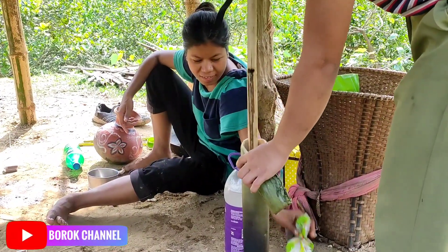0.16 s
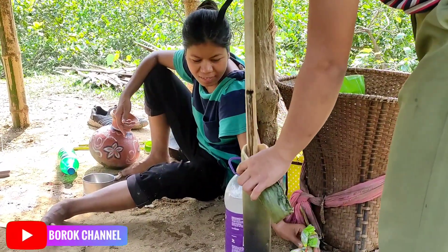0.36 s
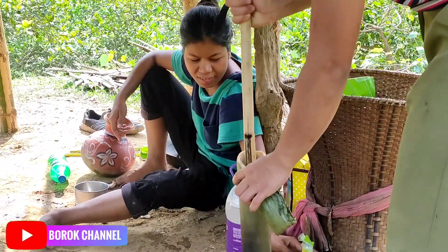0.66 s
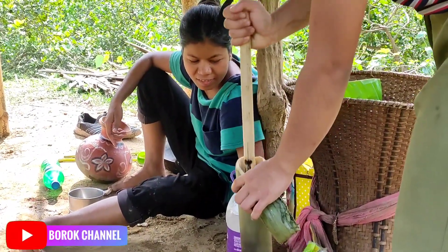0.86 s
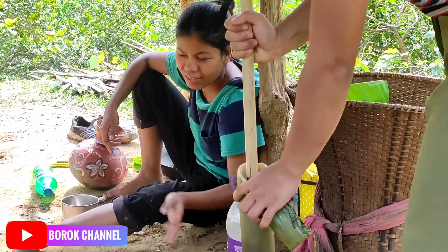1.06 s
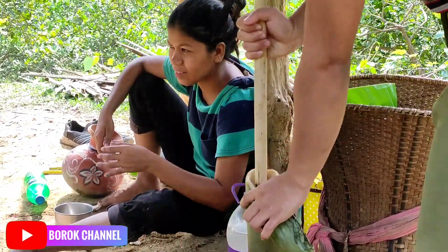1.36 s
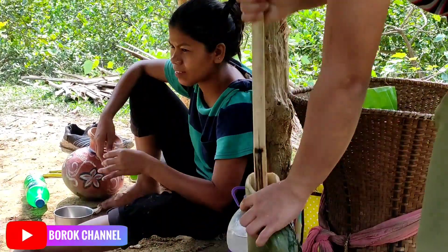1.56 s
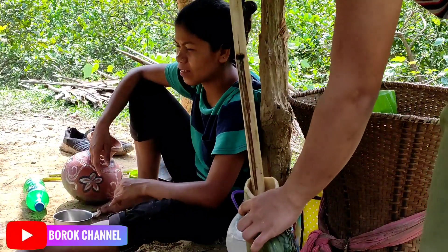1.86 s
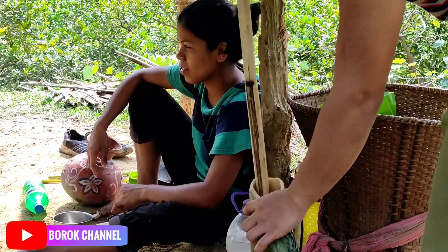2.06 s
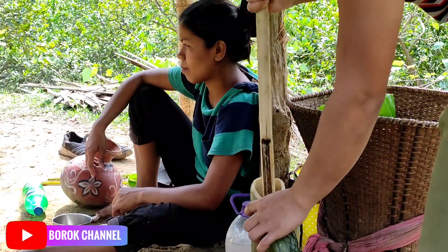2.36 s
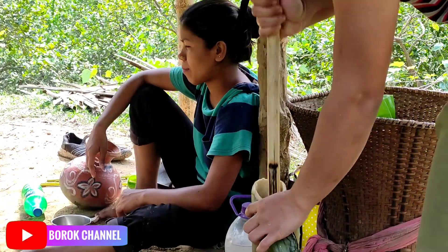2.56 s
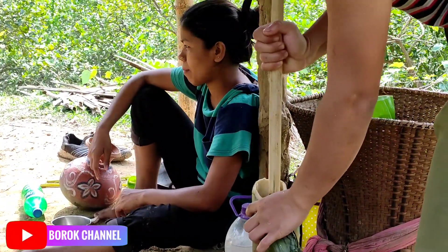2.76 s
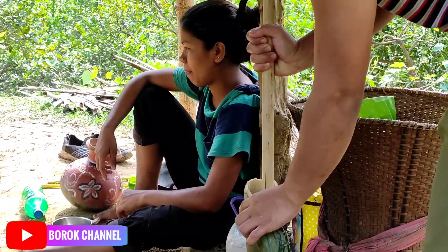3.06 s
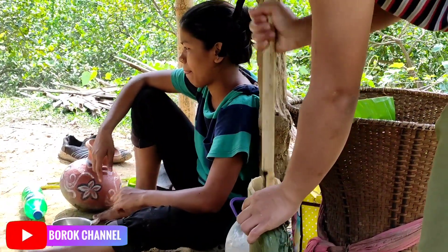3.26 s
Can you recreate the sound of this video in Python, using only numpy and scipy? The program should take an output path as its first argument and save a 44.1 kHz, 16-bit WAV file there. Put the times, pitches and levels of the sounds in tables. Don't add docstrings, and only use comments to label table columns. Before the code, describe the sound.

A bamboo stick scrapes inside a bamboo tube close by: a sharp hollow knock and bright rasp at 0.3 s, fading by 0.5, softer dull rubbing from 1.7 to 2.5, and a firmer stroke at 3.05 trailing off. Low wind puffs thump the left microphone throughout. Leaves hiss, insects buzz, a near bird trills repeatedly, a cricket chirps, faint whistles pass, and tiny grit ticks crackle, mostly before 1.7.

```python
import sys
import numpy as np
from scipy import signal
from scipy.fft import rfft, irfft, next_fast_len
from scipy.io import wavfile
from scipy.ndimage import uniform_filter1d, map_coordinates

SR = 44100
rng = np.random.default_rng(int(sys.argv[2]) if len(sys.argv) > 2 else 0)


def digitize_waveform(pressure):
    field = np.atleast_2d(pressure).T
    bounded = np.clip(field, -1, 1)
    quanta = np.round(bounded * 32767).astype(np.int16)
    wavfile.write(sys.argv[1], SR, quanta)


def attenuation_scalar(level_db):
    decades = np.asarray(level_db, float) / 20
    return 10 ** decades


N = 149940


def unit(x):
    return x / np.sqrt(np.mean(x ** 2) + 1e-20)


def along(points, hz):
    f, v = np.transpose(points)
    return np.interp(np.log(hz + 1), np.log(f + 1), v)


def shaped(points):
    return lambda hz: attenuation_scalar(along(points, hz)) * (hz > .8 * points[0][0])


def curve(rows):
    return np.interp(np.arange(N) / SR, *np.transpose(rows))


def wobble(rate):
    knots = rng.standard_normal(int(N * rate / SR) + 4)
    return map_coordinates(knots, [np.arange(N) * rate / SR])


def filtered(x, response):
    m = next_fast_len(N + SR // 2)
    return irfft(rfft(x, m) * response(np.fft.rfftfreq(m, 1 / SR)), m)[..., :N]


def peak(f, hz, wide):
    return 1j * f * wide / (hz * hz - f * f + 1j * f * wide)


def patchy(patchy_db):
    z = signal.stft(rng.standard_normal((2, N)), nperseg=512)[2]
    field = uniform_filter1d(rng.standard_normal(z.shape[1:]), size=6, axis=0)
    field = uniform_filter1d(field, size=8, axis=1)
    return signal.istft(z * attenuation_scalar(patchy_db * unit(field)), nperseg=512)[1][:, :N]


def panned(x, db):
    return x * attenuation_scalar(np.array([[db / 2], [-db / 2]]))


# start in seconds, length in seconds, level in dB.
GUSTS = [(-.03, 0.079, -37.5), (0.069, 0.15, -34.5), (0.31, 0.1, -35), (0.471, 0.11, -39),
         (0.552, 0.12, -42), (0.768, 0.043, -39), (0.84, 0.16, -47), (1.149, 0.087, -45),
         (1.264, 0.067, -48.5), (1.555, 0.14, -53), (1.68, 0.2, -48), (1.94, 0.21, -39), (2.224, 0.22, -46),
         (2.44, 0.17, -43), (2.64, 0.25, -40), (2.84, .32, -48), (3.095, 0.12, -45), (3.26, 0.085, -39.5)]
# time in seconds, peak in dB, width in ms.
PUFFS = [(0.105, -28.5, 10), (0.13, -30.0, 4.2), (0.162, -24.5, 3.8), (0.18, -31, 4.9), (0.356, -34.5, 4.9),
         (0.42, -26.5, 6.9), (0.455, -31.5, 4.7), (0.501, -31.5, 3.2), (0.513, -32, 4.2),
         (0.784, -30.5, 6.7), (0.945, -32.5, 8.5), (1.196, -34.0, 9.2), (1.329, -34.5, 6.1),
         (1.76, -33, 5.4), (1.998, -26, 5.7), (2.094, -27.5, 7.4), (2.245, -30.5, 8), (2.476, -27, 3.9),
         (2.502, -26, 6.5), (2.545, -32, 5.1), (2.696, -25.5, 4.9), (2.721, -29.5, 3.8),
         (2.754, -26.0, 3.6), (2.791, -26.5, 5.1), (2.804, -32.0, 7.4), (2.827, -30.5, 3.9),
         (3.164, -23.5, 6.3), (3.18, -27.5, 6.5), (.369, -36, 5), (.482, -37, 14), (.554, -37, 11),
         (.574, -37, 7), (.616, -36, 8), (.914, -36, 8), (2.026, -37, 12), (2.567, -35, 8), (2.618, -36, 7),
         (2.656, -37, 6), (2.771, -33, 6), (3.305, -38, 5)]
# time in seconds, depth in dB, width in ms.
DIPS = [(.337, -33, 4), (.345, -33, 6), (.442, -33, 10), (.496, -32, 4), (.521, -30, 5), (.543, -33, 8),
        (.604, -36, 6), (.625, -37, 5), (.872, -34, 5), (.922, -37, 7), (2.003, -30, 6), (2.036, -34, 6),
        (2.088, -31, 7), (2.833, -32, 4), (3.15, -34, 20)]
# frequency in Hz, level in dB per Hz.
RUMBLE = [(7.1, -24), (12, 0.5), (45, 0), (73, -6.5), (135, -20.5), (349, -32.5), (500, -37), (650, -60),
          (1100, -120)]
# frequency in Hz, level in dB per Hz.
LEE = [(10, -6), (30, -2.5), (100, -31), (300, -43), (600, -43.5)]
CALM_DB, LEE_DB = -51.5, -56
EDDY_DB = 2
GUST_HZ, GUST_WIDE_HZ = 89.5, 140
UNDERSHOOT, UNDERSHOOT_WIDER, UNDERSHOOT_LAG = .8, 1.9, .6
FWHM_MS = 1665


def wind():
    t = np.arange(N) / SR
    gusts = np.zeros(N)
    for s, length, db in GUSTS:
        gusts += attenuation_scalar(db) * np.sin(np.pi * np.clip((t - s) / length, 0, 1)) ** 2
    calm = unit(filtered(rng.standard_normal(N), shaped(RUMBLE)))
    brisk = unit(filtered(calm, lambda f: peak(f, GUST_HZ, GUST_WIDE_HZ)))
    left = attenuation_scalar(EDDY_DB * wobble(22)) * (attenuation_scalar(CALM_DB) * calm + gusts * brisk)
    for s, db, ms in PUFFS:
        near = slice(max(round((s - .06) * SR), 0), round((s + .06) * SR))
        u = (t[near] - s) / (ms / FWHM_MS)
        push = (1 + UNDERSHOOT) / np.cosh(1.436 * u) ** 1.17
        trough = UNDERSHOOT * np.exp(-((u - UNDERSHOOT_LAG) / UNDERSHOOT_WIDER) ** 2)
        left[near] += attenuation_scalar(db) * (push - trough)
    for s, db, ms in DIPS:
        near = slice(round((s - .06) * SR), round((s + .06) * SR))
        left[near] -= attenuation_scalar(db) * np.exp(-((t[near] - s) / (ms / FWHM_MS)) ** 2)
    sheltered = unit(filtered(rng.standard_normal(N), shaped(LEE)))
    return np.array([left, attenuation_scalar(LEE_DB + EDDY_DB * wobble(5.83)) * sheltered])


# frequency in Hz, level in dB per Hz.
LEAVES = [(88, 0.5), (150, -6.5), (577, -19.5), (1330, -18.5), (2400, -14), (4400, -18.5), (7200, -16),
          (8550, -21), (14000, -21.5)]
# centre in Hz, width in Hz, level in dB.
CHORUS = [
    (900, 295, -76),
    (2340, 840, -74),
    (6920, 730, -76.5),
]
# frequency in Hz, left-right balance in dB.
LEAN = [(60, 30), (180, -17), (540, 2), (1610, -2), (4830, -8.5), (14500, 1.5)]
# frequency in Hz, left-right likeness from 0 to 1.
ALIKE = [(150, 0.034), (350, 1), (700, 0.48), (1300, 0.052)]
LEAVES_DB, CHORUS_SWELL_DB = -60, .8


def forest():
    leaves = unit(filtered(patchy(patchy_db=2.6), shaped(LEAVES)))
    hiss = attenuation_scalar(LEAVES_DB + 0.4 * wobble(2.48)) * leaves
    for hz, wide, db in CHORUS:
        band = unit(filtered(patchy(patchy_db=2), lambda f: peak(f, hz, wide) ** 2))
        hiss = hiss + attenuation_scalar(db + CHORUS_SWELL_DB * wobble(14)) * band
    turn = lambda hz: np.arccos(np.clip(along(ALIKE, hz), -1, 1)) / 2
    mid, side = filtered(hiss, lambda hz: [np.cos(turn(hz)), np.sin(turn(hz))])
    ports = np.array([mid + side, mid - side])
    return filtered(ports, lambda hz: attenuation_scalar(np.outer([.5, -.5], along(LEAN, hz))))


# time in seconds, level in dB.
KATYDID = [
    (0, -78),
    (.5, -76.5),
    (1.2, -74),
    (2.0, -71.5),
    (2.5, -75),
    (3.4, -78),
]
KATYDID_HZ, KATYDID_WIDE_HZ, KATYDID_PAN_DB = 11200, 1100, -11
BURSTS_PER_S, BURST_PEAK, BURST_SHARP = 39.64, .0072, 0.45


def katydid():
    phase = np.pi * BURSTS_PER_S * (np.arange(N) / SR - BURST_PEAK)
    gate = np.abs(np.cos(phase)) ** (2 * BURST_SHARP)
    rasp = filtered(rng.standard_normal((2, N)), lambda f: peak(f, KATYDID_HZ, KATYDID_WIDE_HZ) ** 2)
    return panned(attenuation_scalar(curve(KATYDID)) * unit(gate * rasp), KATYDID_PAN_DB)


# start in seconds, length in seconds, level in dB.
TRILLS = [(.025, 0.073, -52), (0.253, 0.068, -60), (0.9, 0.077, -57), (1.139, 0.07, -54.5),
          (1.424, 0.068, -56), (1.557, 0.046, -56), (1.666, 0.088, -56.5), (1.851, 0.061, -57.5),
          (2.011, 0.14, -55), (2.234, 0.089, -54.5), (2.453, .07, -57.5), (2.668, 0.059, -60),
          (2.917, 0.042, -58.5), (3.066, 0.081, -55), (3.165, 0.095, -58)]
# start in seconds, length in seconds, first pitch in Hz, last pitch in Hz, level in dB.
SLURS = [(.15, .035, 2900, 2700, -67), (.21, .03, 4200, 4000, -68), (.252, .02, 3300, 3050, -65),
         (.895, .035, 4100, 3000, -66), (.92, .04, 3000, 2550, -62), (1.865, .03, 4300, 3600, -66),
         (2.33, .03, 3100, 3700, -67), (2.352, .035, 3850, 4200, -60), (2.545, .03, 3500, 2700, -65),
         (2.66, .025, 4200, 3900, -68), (2.885, .05, 4200, 2800, -60), (2.92, .04, 3300, 2700, -66),
         (2.76, .29, 850, 960, -71)]
TRILL_HZ, SAG_HZ_PER_S, NOTES_PER_S, NOTE_DROP_HZ = 7410, 7900, 82, 1268
TRILL_FADES_DB, TRILL_PAN_DB, SLUR_PAN_DB = 5, -9, -6
WAVER_HZ = 60
HOARSE, HOARSE_PER_S, FAR_HOARSE = .7, 1100, .5
TREES_T60, TREES_DB = 0.085, 2.5


def birds():
    t, near, far = np.arange(N) / SR, np.zeros(N), np.zeros(N)
    waver = WAVER_HZ * wobble(120)
    for s, length, db in TRILLS:
        u = np.clip(t - s, 0, length)
        note = u * NOTES_PER_S % 1
        hz = TRILL_HZ - SAG_HZ_PER_S * u - NOTE_DROP_HZ * (note - .5) + waver
        swell = np.abs(np.sin(np.pi * u / length)) ** 0.35 * (u < length)
        pulses = np.abs(np.sin(np.pi * note)) ** 2.8
        level = attenuation_scalar(db + TRILL_FADES_DB * (.5 - u / length))
        near += level * swell * pulses * np.sin(2 * np.pi * np.cumsum(hz) / SR)
    for s, length, from_hz, to_hz, db in SLURS:
        u = np.clip((t - s) / length, 0, 1)
        hz = from_hz + (to_hz - from_hz) * u + waver * from_hz / TRILL_HZ * 2
        far += attenuation_scalar(db) * np.sin(np.pi * u) * np.sin(2 * np.pi * np.cumsum(hz) / SR)
    hoarse = lambda share, rate: 1 - share + share * wobble(rate)
    direct = panned(near * hoarse(HOARSE, HOARSE_PER_S), TRILL_PAN_DB)
    direct = direct + panned(far * hoarse(FAR_HOARSE, HOARSE_PER_S / 6), SLUR_PAN_DB)
    tail = rng.standard_normal((2, SR // 3)) * attenuation_scalar(-60 * t[:SR // 3] / TREES_T60)
    echo = [signal.fftconvolve(x, h / np.linalg.norm(h))[:N] for x, h in zip(direct, tail)]
    return direct + attenuation_scalar(TREES_DB) * np.array(echo)


# time in seconds, level in dB.
CHIRPS = [(.074, -68), (.188, -66), (.535, -70), (.709, -67), (.819, -66), (.925, -70), (1.064, -65),
          (1.223, -66), (1.372, -68), (1.5, -69), (1.627, -68), (1.748, -68), (2.33, -68), (2.644, -66),
          (2.802, -67), (2.937, -67), (3.239, -68), (3.38, -66)]
CHIRP_HZ, CHIRP_WIDE_HZ, CHIRP_S, CHIRP_PAN_DB = 5200, 600, .018, -8


def cricket():
    t = np.arange(N) / SR
    swell = sum(attenuation_scalar(db) * np.exp(-((t - s) / CHIRP_S) ** 2) for s, db in CHIRPS)
    ring = unit(filtered(rng.standard_normal((2, N)), lambda f: peak(f, CHIRP_HZ, CHIRP_WIDE_HZ) ** 2))
    return panned(swell * ring, CHIRP_PAN_DB)


# time in seconds, peak in dB, left-right balance in dB.
TICKS = [(0.2319, -48, 0), (0.41, -50, 3), (.4224, -50, 3), (.5067, -54, 3), (0.5282, -44, 4),
         (0.618, -52, 6), (0.7344, -49, 5), (0.7944, -48.5, 2), (0.8709, -47, 4), (0.8964, -47, 0),
         (0.9644, -46.5, 9), (1.2635, -54, 3), (1.2804, -52, 6), (1.3279, -47, 7), (1.3598, -49, 8),
         (1.6477, -47, -13), (1.7953, -55, -5), (2.128, -50, 0), (2.5995, -56, 0)]
# frequency in Hz, level in dB per Hz.
GRIT = [(900, -42), (2500, -7), (5000, -6), (8000, 1), (10500, -2), (13000, -3)]
TICK_T60, TICK_DB = .03, -3


def grit():
    out, t = np.zeros((2, N + SR)), np.arange(SR // 20) / SR
    for s, db, pan_db in TICKS:
        crack = attenuation_scalar(db + TICK_DB - 60 * t / TICK_T60) * rng.standard_normal((2, len(t)))
        start = round(s * SR)
        out[:, start:start + len(t)] += panned(crack, pan_db)
    return filtered(out[:, :N], shaped(GRIT))


# start in seconds, length in seconds, level in dB, fade in dB, treble in dB.
STROKES = [(0.301, 0.043, -45.5, 5, 2), (.331, .068, -52.5, 6, 3), (0.41, 0.072, -62, 1, -1),
           (1.701, 0.058, -55.5, 21, -9), (1.855, 0.085, -62.5, 8, 2), (1.993, .15, -56.5, 1, -4),
           (2.125, .11, -57.5, 1, -4), (2.215, .11, -57.5, 0, -3), (2.305, .12, -59, 3, -5),
           (2.41, .08, -65, 3, -4), (3.055, .098, -49, 8, -5), (3.142, .09, -56.5, -1, -5),
           (3.21, .08, -60, 3, -4), (3.285, 0.14, -66, -7, -3)]
# centre in Hz, width in Hz, level in dB.
TUBE = [
    (390, 190, -9),
    (860, 280, 1.5),
    (1573, 440, 3),
    (2300, 514, 7.5),
    (3190, 1380, 3),
]
# frequency in Hz, level in dB per Hz.
RASP = [(3000, -18), (5400, 1.5), (7300, 3.5), (8800, 2), (11000, 0.5), (13000, 1)]
SLIPS_PER_S, SLIP_SPREAD_DB, JUDDER_DB = 8000, 3.5, .7
ATTACK_S, RELEASE_S, RASP_FADES = 0.009, 0.011, 0.6
SLOW_ATTACK_DB, FIRM_DB = .0008, -45
PAN_PER_TREBLE, RASP_PAN = 1, 1
SHARED, LAG_S = 0.4, .00043


def stick():
    t, out = np.arange(N) / SR, np.zeros((2, N))
    slips = (rng.random(N) < SLIPS_PER_S / SR) * attenuation_scalar(SLIP_SPREAD_DB * rng.standard_normal(N))
    common, *own = rng.standard_normal((3, N))
    lagged = np.roll(common, round(LAG_S * SR))
    noise = SHARED * np.array([common, lagged]) + (1 - SHARED) * np.array(own)
    roughness = np.sqrt(np.abs(uniform_filter1d(slips ** 2, size=32)))
    drive = roughness * attenuation_scalar(JUDDER_DB * wobble(60)) * noise
    modes = lambda f: sum((-1) ** k * attenuation_scalar(db) * peak(f, hz, wide) for k, (hz, wide, db) in enumerate(TUBE))
    body = unit(filtered(drive, modes))
    rasp = unit(filtered(drive, shaped(RASP)))
    for s, length, db, fade_db, treble_db in STROKES:
        slower = SLOW_ATTACK_DB * max(FIRM_DB - db, 0)
        attack = np.clip((t - s) / (ATTACK_S + slower), 0, 1)
        release = np.clip((s + length - t) / (RELEASE_S + slower), 0, 1)
        edges = attack * release
        faded_db = fade_db * np.clip((t - s) / length, 0, 1)
        pan_db = PAN_PER_TREBLE * treble_db
        out += panned(edges * attenuation_scalar(db - faded_db) * body, pan_db)
        out += panned(edges * attenuation_scalar(db + treble_db - RASP_FADES * faded_db) * rasp, RASP_PAN * pan_db)
    return out


# time in seconds, mode in Hz, width in Hz, level in dB, left-right balance in dB.
KNOCKS = [(.3105, 2300, 250, -38, 1), (1.701, 2400, 600, -53.5, -5), (3.053, 1500, 600, -51, -4),
          (3.068, 2500, 900, -55, -5), (.304, 390, 150, -52, 0), (.312, 5500, 300, -52, 0),
          (.318, 900, 120, -53, 0), (.3615, 2400, 700, -50, 0), (.366, 950, 120, -55, 0),
          (.42, 2800, 300, -59, -6), (1.735, 880, 100, -62, 0), (2.27, 930, 80, -60, 0),
          (2.925, 970, 90, -61, 0), (3.056, 780, 120, -56, 0), (3.258, 2350, 300, -56.5, -14)]
KNOCK_T60 = 0.058


def knocks():
    t, out = np.arange(SR // 5) / SR, np.zeros((2, N + SR))
    f = np.fft.rfftfreq(len(t), 1 / SR)
    for s, hz, wide, db, pan_db in KNOCKS:
        contacts = rng.standard_normal((2, len(t)))
        ring = unit(irfft(rfft(contacts) * peak(f, hz, wide) ** 2, len(t)))
        start = round(s * SR)
        out[:, start:start + len(t)] += panned(attenuation_scalar(db - 60 * t / KNOCK_T60) * ring, pan_db)
    return out[:, :N]


def scene():
    return wind() + forest() + katydid() + birds() + cricket() + grit() + stick() + knocks()


def top_cut(x):
    return signal.sosfilt(signal.butter(12, 15070, fs=SR, output="sos"), x)


TOP_HZ = 14350


def record(dry):
    mix = filtered(dry, lambda hz: hz < TOP_HZ)
    return top_cut(mix)


dry = scene()
out = record(dry)
digitize_waveform(out)
```